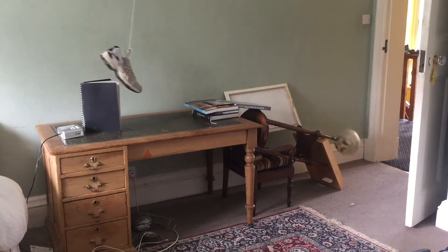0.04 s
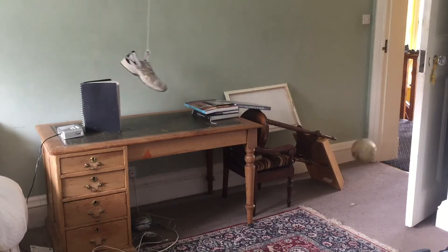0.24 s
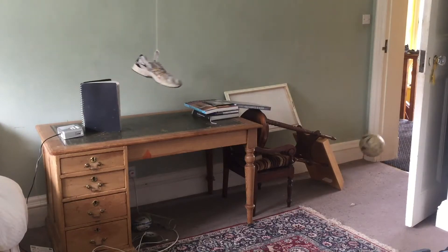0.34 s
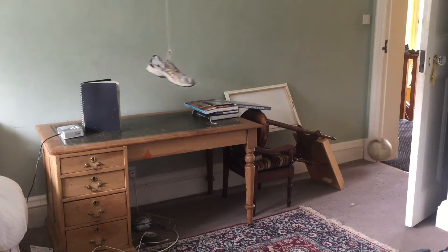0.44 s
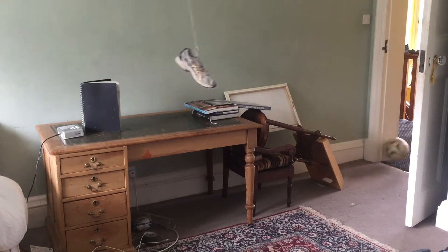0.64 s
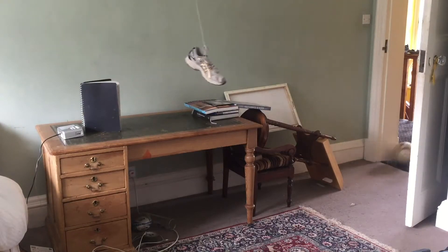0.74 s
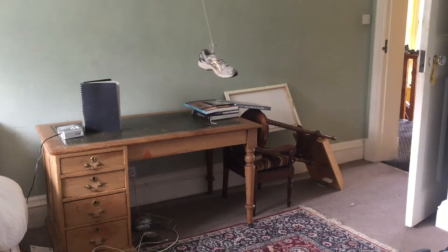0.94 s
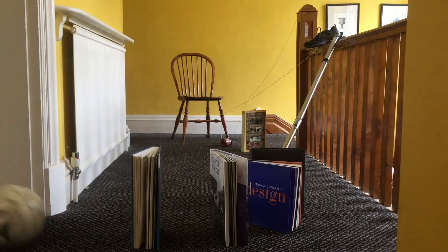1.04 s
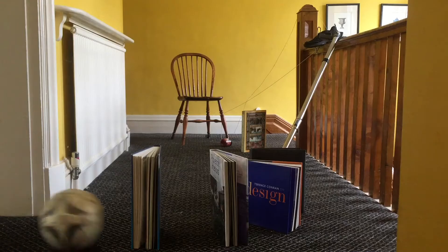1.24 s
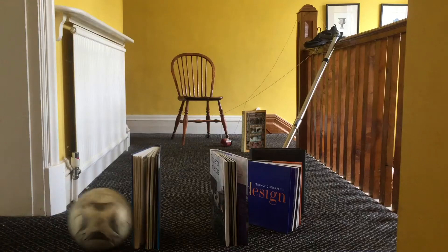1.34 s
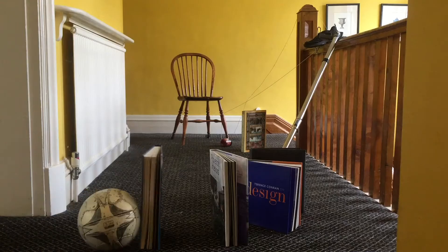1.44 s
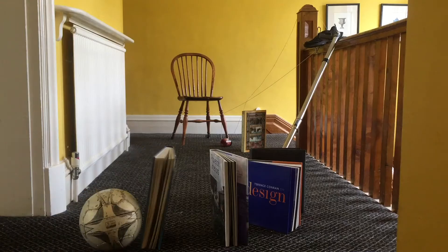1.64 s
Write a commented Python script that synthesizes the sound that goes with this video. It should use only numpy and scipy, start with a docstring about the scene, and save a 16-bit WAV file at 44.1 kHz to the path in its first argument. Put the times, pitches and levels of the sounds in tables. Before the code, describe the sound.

A football knocks hollowly on a wooden chair, then bounces on carpeted floorboards with a booming thud at 0.2 seconds and weaker ones at 0.6 and 0.8, briefly brushing a door frame between them. It drops dully at 1.0 and rolls with two soft bumps. Near 1.5 it knocks a book, whose cover clacks. Each hit rings briefly in the room, over faint rumble and hiss.

```python
"""Indoors, a study with a carpeted timber floor and the landing outside, on one mono microphone.
A football glances off a wooden chair and bounces three times, brushing a door frame on the way.
It drops onto the landing, rolls with soft bumps and knocks a standing book, whose cover clacks.
Each blow is a short slap of noise, a room tail that dies band by band, and the ringing modes of
what was struck. Faint house rumble and microphone hiss lie underneath."""
import sys
import numpy as np
from scipy import signal
from scipy.io import wavfile

SR = 44100
rng = np.random.default_rng(int(sys.argv[2]) if len(sys.argv) > 2 else 0)


def waveform_to_disk(signal):
    """Save audio, clipped to [-1, 1], as 16-bit WAV at the path in sys.argv[1]."""
    frames = np.transpose(np.atleast_2d(signal))
    scaled = np.clip(frames, -1, 1) * 32767
    samples = np.round(scaled).astype(np.int16)
    wavfile.write(sys.argv[1], SR, samples)


N = 74970
TIME = np.arange(N) / SR
BAND_EDGES_HZ = 22 * 2 ** (np.arange(20) / 2)
PING_T60_S = 0.0058
LOW_CUT_HZ, HIGH_CUT_HZ = 30, 15700

# The ball on the chair. Each row: start in seconds, level in dB, treble tilt in dB per octave.
CHAIR_KNOCKS = [(-0.004, -2, 0.5)]
# Contact noise of the chair. Each row: frequency in Hz, half-octave level in dB.
CHAIR_SLAP = [(90, -57.5), (300, -50.5), (600, -47), (1100, -51), (2000, -57.5), (3500, -74), (7000, -80),
              (14000, -94)]
# Chair and study ringing together. Each row: pitch in Hz, gain in dB, t60 in seconds.
CHAIR_MODES = [(42.8, -47, 0.39), (52.1, -51.5, 1), (163.5, -52, 0.76), (183.7, -56, .55),
               (341.6, -38, 0.45), (402, -40, 0.42), (428, -41.5, 0.47), (442.4, -43.5, 0.45),
               (533, -52, 0.72), (612, -49, 0.34), (667.8, -36.5, 0.22), (709.7, -45, 0.26),
               (1050, -49, 0.19), (1148, -43.5, 0.22), (1164, -51, 0.44), (1953, -54.5, 0.24)]
# The study's reverberation. Each row: frequency in Hz, t60 in seconds.
STUDY_T60 = [(130, 1), (400, 0.43), (900, 0.48), (2000, 0.27), (5000, 0.31), (14000, 0.131)]
# Still air and microphone hiss. Each row: frequency in Hz, half-octave level in dB.
ROOM_TONE = [(36, -97), (60, -73), (120, -81), (250, -87.5), (500, -88), (1000, -88), (2000, -84.5),
             (4000, -85.5), (8000, -86.5), (11000, -88.5), (15000, -90.5)]

# The ball on the study floor. Each row: start in seconds, slap level in dB, treble tilt in dB per
# octave, levels of joists, boards and hollow in dB, factor on the ring time.
BOUNCES = [(0.232, -3, 0.5, -2, 0, -3.5, 1.036), (0.588, -14.5, -4, -11.5, -14.5, -7.5, 0.7),
           (0.814, -43, 4.7, -19, -21, -15, 0.4)]
# The ball's skin on carpet. Each row: frequency in Hz, half-octave level in dB.
CARPET_SLAP = [(180, -64), (300, -48), (550, -45), (1000, -47.5), (1800, -50.5), (3200, -64.5), (6500, -72),
               (14000, -83.5)]
# The floor joists. Each row: pitch in Hz, gain in dB, t60 in seconds before the bounce's factor.
JOIST_MODES = [(43.36, -35.5, 0.56), (46.9, -23.5, 0.47), (57.4, -38.5, .51)]
# The floorboards. Each row: pitch in Hz, gain in dB, base t60 in seconds.
BOARD_MODES = [(77, -38.5, 0.58), (98.2, -6, 0.1), (108.8, -34.5, 0.41)]
# The hollow under the boards. Each row: pitch in Hz, gain in dB, base t60 in seconds.
HOLLOW_MODES = [(142.7, -34, 0.34), (160.6, -40, .45), (177.4, -40, 0.34), (208.6, -47.5, 0.58)]
# The study and its furniture. Each row: pitch in Hz, gain in dB, base t60 in seconds.
STUDY_MODES = [(265.3, -41.5, 0.23), (294.5, -42, 0.29), (336.8, -45.5, 0.31), (348, -39.5, .26),
               (401.5, -35, 0.2), (471.4, -43, 0.32), (511, -46, 0.27), (559, -51, 0.4),
               (600.7, -41.5, 0.21), (652, -43.5, 0.19), (738, -49, 0.18), (810, -55.5, 0.65),
               (867, -50, 0.43), (902, -51, 0.24), (1136, -43.5, 0.11), (1450, -46.5, 0.094),
               (1590, -54.5, 0.25), (2222, -53.5, 0.2)]

# The ball on the door frame. Each row: start in seconds, level in dB, treble tilt in dB per octave.
SCUFFS = [(0.652, -2.5, 2.5)]
# Leather rubbing on paint. Each row: frequency in Hz, half-octave level in dB.
SCUFF_NOISE = [(130, -87), (400, -79), (800, -70), (1300, -67.5), (2000, -73), (3000, -69), (5000, -86),
               (14000, -96)]
# The frame's wood. Each row: pitch in Hz, gain in dB, t60 in seconds.
DOOR_FRAME_MODES = [(694, -62, 0.23), (946, -67, 0.16), (1243, -64, 0.12), (1834, -59.5, 0.12),
                    (2570, -67, 0.17), (2590, -66, 0.17), (3300, -67, 0.12)]

# Grit under the ball. Each row: start in seconds, level in dB, treble tilt in dB per octave.
GRIT_CLICKS = [(1.0188, -19.5, 2)]
# Hard contact noise of grit and book cover. Each row: frequency in Hz, half-octave level in dB.
CLACK_NOISE = [(130, -72), (1000, -73), (2500, -48), (4000, -52.5), (6000, -56), (9000, -56), (14000, -56)]
# The landing's reverberation. Each row: frequency in Hz, t60 in seconds.
LANDING_T60 = [(130, 0.29), (400, 0.4), (1000, .3), (2500, 0.3), (6000, 0.3), (14000, 0.14)]
# The ball on the landing. Each row: start in seconds, slap level in dB, treble tilt in dB per
# octave, boom level in dB, factor on the ring time.
LANDING_BUMPS = [(1.019, -2.5, 1, 5.5, 0.87), (1.179, -10.5, 2.5, 1.5, 0.28), (1.290, -16, 3, -3, 0.24)]
# Contact noise of the landing. Each row: frequency in Hz, half-octave level in dB.
LANDING_SLAP = [(130, -56), (300, -57.5), (550, -74), (1000, -68.5), (2000, -73.5), (4000, -87),
                (14000, -97)]
# The landing's floor. Each row: pitch in Hz, gain in dB, base t60 in seconds.
LANDING_MODES = [(43.7, -66.5, 0.59), (48.1, -52, 0.56), (55.7, -52.5, 0.43), (70.6, -53.5, 0.6),
                 (98.7, -49.5, 0.19), (108.5, -52.5, 0.09), (133.4, -57.5, .3), (215.5, -72, 0.55)]
# The stairwell. Each row: pitch in Hz, gain in dB, base t60 in seconds.
STAIRWELL_MODES = [(223.6, -65, 0.44), (263, -59, 0.38), (282, -61, 0.18), (348, -65.5, 0.3),
                   (369, -63.5, 0.19), (740, -71, .2), (1067, -71, .15)]
# The ball crossing a loose board. Each row: start in seconds, level in dB, factor on the ring time.
BOARD_TICKS = [(1.174, 1.5, 1)]
# The loose board. Each row: pitch in Hz, gain in dB, t60 in seconds.
TICK_MODES = [(765, -65, 0.065), (880, -69, .08), (1180, -69, 0.07)]

# The ball on the book. Each row: start in seconds, level in dB, treble tilt in dB per octave.
BOOK_KNOCKS = [(1.463, -1.5, -1)]
# Contact noise of the book. Each row: frequency in Hz, half-octave level in dB.
BOOK_SLAP = [(130, -61), (300, -53.5), (600, -60.5), (1200, -58), (2400, -56.5), (4000, -73), (8000, -72),
             (14000, -63)]
# The book's dull thump, its modes all pushed the same way. Each row: pitch in Hz, gain in dB, t60 in seconds.
BOOK_THUMP_MODES = [(188, -40, 0.022), (415, -45, 0.03)]
# The book's body. Each row: pitch in Hz, gain in dB, t60 in seconds.
BOOK_MODES = [(68.6, -55, .22), (89, -41, 0.15), (146, -56, 0.15), (205.4, -50, 0.12), (209.6, -58, 0.32),
              (248, -52, 0.36), (313, -52.5, 0.27), (346.6, -51.5, 0.27), (376, -61, 0.52),
              (426, -53, 0.22), (537, -57, 0.19), (589, -64, 0.2), (622, -59, 0.34), (1066, -65.5, 0.35),
              (1120, -65, 0.32)]
# The landing's hollow note. Each row: pitch in Hz, gain in dB, t60 in seconds.
LANDING_NOTE = [(262.1, -38.5, 0.23)]
# The cover hitting the pages. Each row: start in seconds, level in dB, treble tilt in dB per octave,
# ping pitch in Hz, ping level in dB.
COVER_CLACKS = [(1.4700, -9, 5, 6360, -53), (1.4730, 0, 1.5, 8900, -45.5), (1.5336, -10.5, 2, 5880, -46.5)]


def from_db(db):
    """Decibels to gain."""
    return 10 ** (np.asarray(db) / 20)


def at_hz(points, hz):
    """Read a table on a log-frequency axis."""
    frequencies, values = np.transpose(points)
    return np.interp(np.log(hz), np.log(frequencies), values)


def noise_bands(lowest_hz):
    """Half-octave bands of unrelated noise, rms 1, as (centre Hz, samples)."""
    for low, high in zip(BAND_EDGES_HZ, BAND_EDGES_HZ[1:]):
        if high > lowest_hz:
            sos = signal.butter(3, [low, high], "band", fs=SR, output="sos")
            band = signal.sosfilt(sos, rng.standard_normal(N + SR))[SR:]
            yield np.sqrt(low * high), band / band.std()


def swell_and_die(start, rise_s, t60):
    """An envelope that rises from the start and dies by 60 dB every t60 seconds."""
    age = np.maximum(TIME - start, 0)
    return (1 - np.exp(-age / rise_s)) * np.exp(-np.log(1000) * age / t60)


def slaps(blows, spectrum, room_t60, rise_s, contact_s, room_db, pivot_hz):
    """Contact noise reaches the microphone direct, with the room's tail behind it, band by band."""
    out = np.zeros(N)
    for hz, band in noise_bands(spectrum[0][0]):
        power = np.zeros(N)
        for start, db, tilt, *_ in blows:
            age = np.maximum(TIME - start, 0)
            direct = (1 - np.exp(-age / rise_s)) * np.exp(-(age / contact_s) ** 2)
            tail = from_db(room_db) * swell_and_die(start, contact_s / 2, at_hz(room_t60, hz))
            gain = from_db(db + tilt * np.log2(hz / pivot_hz))
            power += gain ** 2 * (direct ** 2 + tail ** 2)
        out += from_db(at_hz(spectrum, hz)) * np.sqrt(power) * band
    return out


def ringing(blows, modes, rise_s, lag_s):
    """Each blow (start, dB, ring factor) sets the modes swinging, neighbours in opposite directions."""
    out = np.zeros(N)
    for start, db, ring_factor in blows:
        onset = start + lag_s
        for k, (hz, mode_db, t60) in enumerate(modes):
            swing = (-1) ** k * np.sin(2 * np.pi * hz * (TIME - onset))
            out += from_db(db + mode_db) * swell_and_die(onset, rise_s, t60 * ring_factor) * swing
    return out


def boom(blows, modes, rise_s, lag_s):
    """Each blow pushes all the modes the same way; close ones beat."""
    blows = list(blows)
    return sum(ringing(blows, [mode], rise_s, lag_s) for mode in modes)


def full_ring(knocks):
    """Knocks as blows that let the modes ring for their whole t60."""
    return [(start, db, 1) for start, db, _ in knocks]


def chair():
    """A hollow wooden knock that rings on in the study."""
    slap = slaps(CHAIR_KNOCKS, CHAIR_SLAP, STUDY_T60,
                 rise_s=0.0011, contact_s=0.025, room_db=-2, pivot_hz=605)
    return slap + ringing(full_ring(CHAIR_KNOCKS), CHAIR_MODES, rise_s=0.036, lag_s=0.00097)


def room_tone():
    """Faint rumble of the house under the microphone's even hiss."""
    return sum(from_db(at_hz(ROOM_TONE, hz)) * band for hz, band in noise_bands(ROOM_TONE[0][0]))


def bounces():
    """The ball's skin slaps the carpet, then the floor booms; each spot stirs it differently."""
    starts, slap_db, _, joists_db, boards_db, hollow_db, ring_factors = np.transpose(BOUNCES)
    slap = slaps(BOUNCES, CARPET_SLAP, STUDY_T60,
                 rise_s=0.0018, contact_s=0.028, room_db=-3.5, pivot_hz=488)
    joists = boom(zip(starts, joists_db, ring_factors), JOIST_MODES, rise_s=0.033, lag_s=0.0025)
    boards = boom(zip(starts, boards_db, ring_factors), BOARD_MODES, rise_s=0.033, lag_s=0.0098)
    hollow = ringing(zip(starts, hollow_db, ring_factors), HOLLOW_MODES, rise_s=0.004, lag_s=0.0021)
    study = ringing(zip(starts, slap_db, ring_factors), STUDY_MODES, rise_s=0.012, lag_s=0.002014)
    return slap + joists + boards + hollow + study


def door_frame():
    """A soft, brief rub of leather on painted wood, which rings a little."""
    rub = slaps(SCUFFS, SCUFF_NOISE, STUDY_T60,
                rise_s=0.0064, contact_s=0.043, room_db=-15, pivot_hz=2040)
    return rub + ringing(full_ring(SCUFFS), DOOR_FRAME_MODES, rise_s=0.009, lag_s=0.0091)


def grit():
    """A grain clicks under the dropping ball; it sounds close, with hardly any room on it."""
    return slaps(GRIT_CLICKS, CLACK_NOISE, LANDING_T60,
                 rise_s=0.0001, contact_s=0.00077, room_db=-30, pivot_hz=5000)


def landing():
    """One dull drop, then the bumps of the rolling ball, stir the floor and the stairwell."""
    starts, slap_db, _, boom_db, ring_factors = np.transpose(LANDING_BUMPS)
    slap = slaps(LANDING_BUMPS, LANDING_SLAP, LANDING_T60,
                 rise_s=0.00055, contact_s=0.009, room_db=-10, pivot_hz=504)
    floor = boom(zip(starts, boom_db, ring_factors), LANDING_MODES, rise_s=0.0068, lag_s=0.0039)
    stairwell = ringing(zip(starts, slap_db, ring_factors), STAIRWELL_MODES, rise_s=0.0023, lag_s=0.001)
    return slap + floor + stairwell


def loose_board():
    """A loose board ticks under the rolling ball."""
    return ringing(BOARD_TICKS, TICK_MODES, rise_s=0.0072, lag_s=0.0012)


def book():
    """The ball thumps the standing book; the book thumps and rings, and a hollow note swells in the landing."""
    slap = slaps(BOOK_KNOCKS, BOOK_SLAP, LANDING_T60,
                 rise_s=0.00052, contact_s=0.0055, room_db=-2.5, pivot_hz=615)
    blows = full_ring(BOOK_KNOCKS)
    thump = boom(blows, BOOK_THUMP_MODES, rise_s=0.00086, lag_s=0.0018)
    body = ringing(blows, BOOK_MODES, rise_s=0.0085, lag_s=0.00096)
    note = ringing(blows, LANDING_NOTE, rise_s=0.094, lag_s=0.0118)
    return slap + thump + body + note


def book_cover():
    """The stiff cover clacks against the pages, each time with a tiny ping."""
    clacks = slaps(COVER_CLACKS, CLACK_NOISE, LANDING_T60,
                   rise_s=0.00051, contact_s=0.0014, room_db=-15.5, pivot_hz=4900)
    pings = sum(ringing([(start, db, 1)], [(hz, 0, PING_T60_S)], rise_s=0.00028, lag_s=0.000273)
                for start, _, _, hz, db in COVER_CLACKS)
    return clacks + pings


def scene():
    """The ball's whole run as it reaches the microphone, in mono."""
    in_study = chair() + bounces() + door_frame()
    on_landing = landing() + grit() + loose_board() + book() + book_cover()
    return (in_study + on_landing + room_tone())[None, :]


def record(dry):
    """The microphone loses the deepest bass; the top is cut steeply."""
    low_cut = signal.butter(4, LOW_CUT_HZ, "high", fs=SR, output="sos")
    high_cut = signal.ellip(10, 0.3, 70, HIGH_CUT_HZ, fs=SR, output="sos")
    return signal.sosfilt(high_cut, signal.sosfilt(low_cut, dry))


dry = scene()
out = record(dry)
waveform_to_disk(out)
```